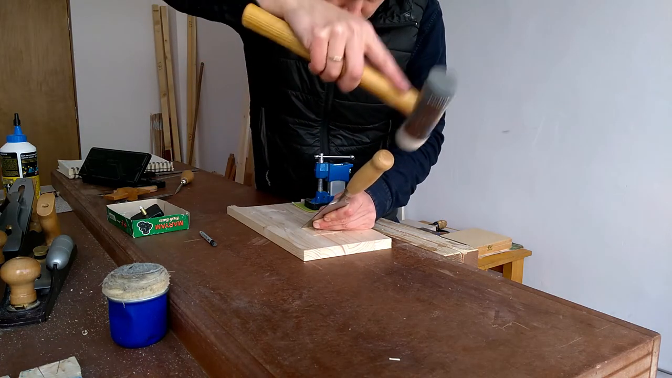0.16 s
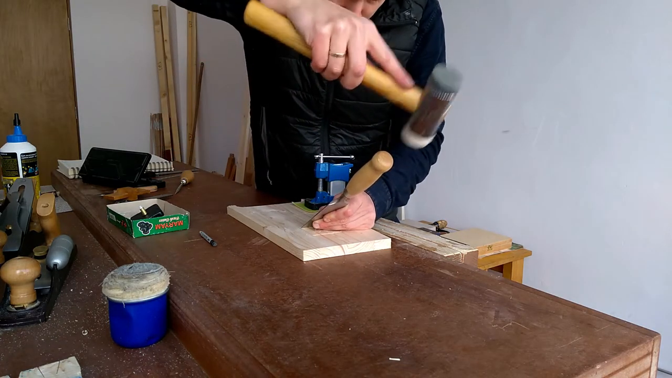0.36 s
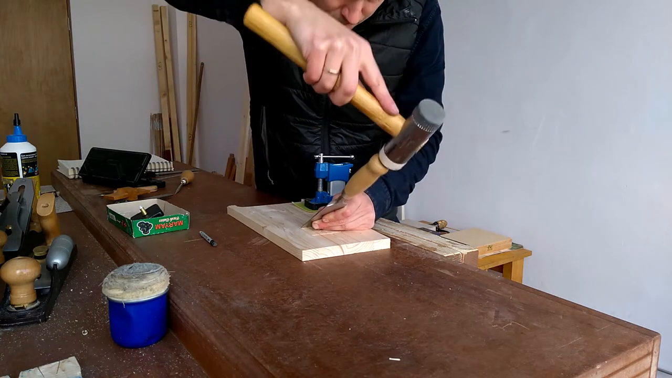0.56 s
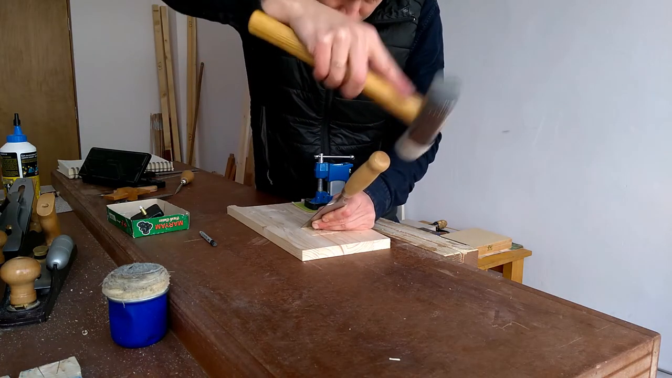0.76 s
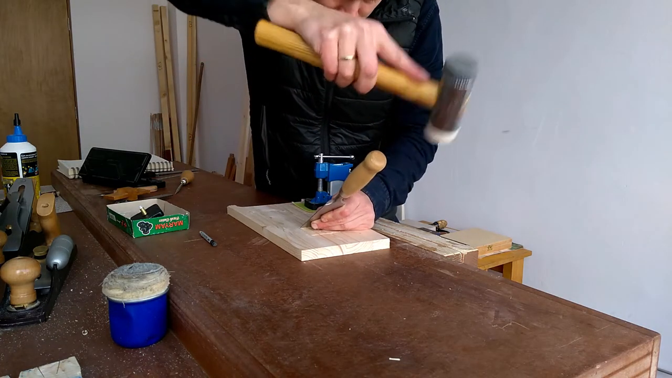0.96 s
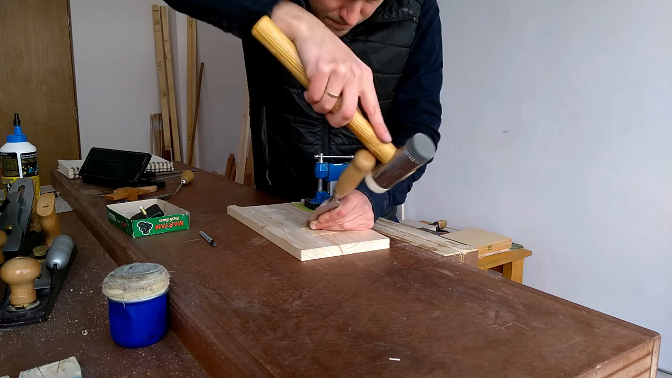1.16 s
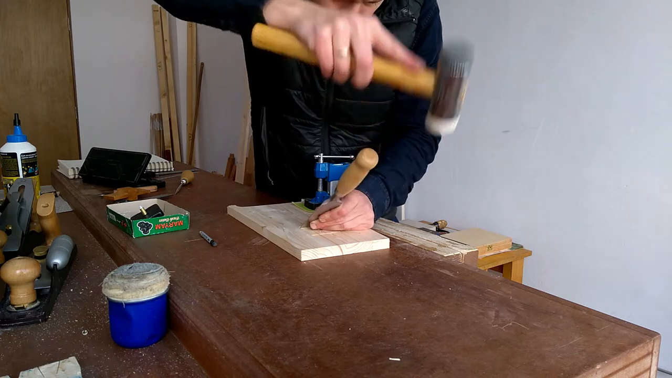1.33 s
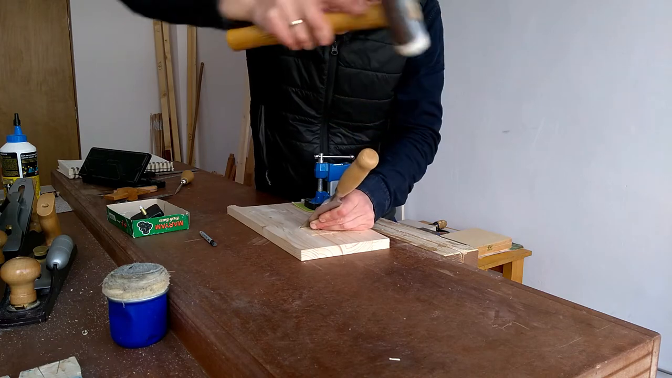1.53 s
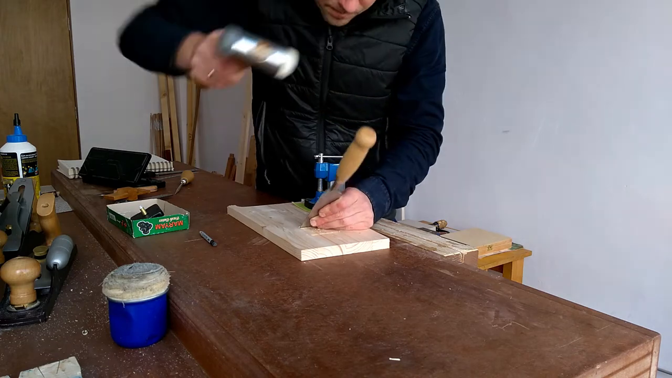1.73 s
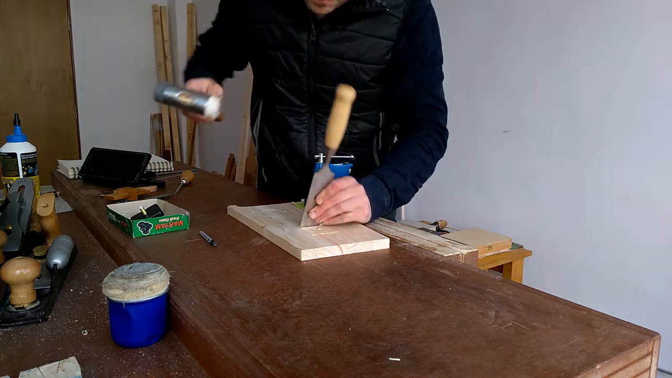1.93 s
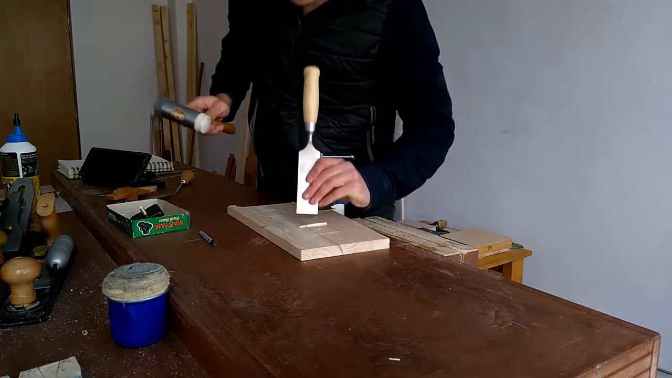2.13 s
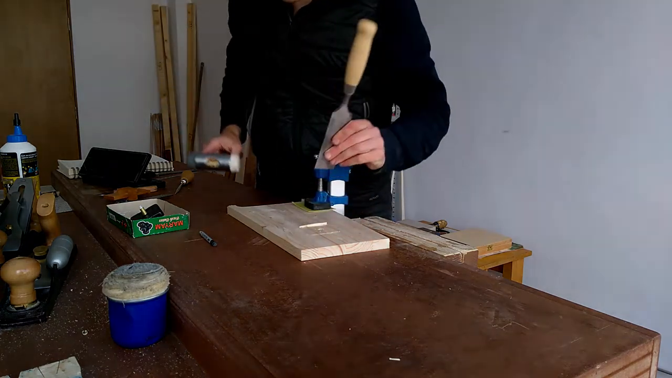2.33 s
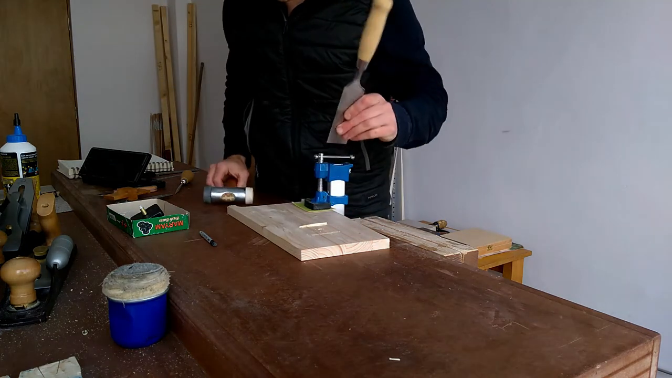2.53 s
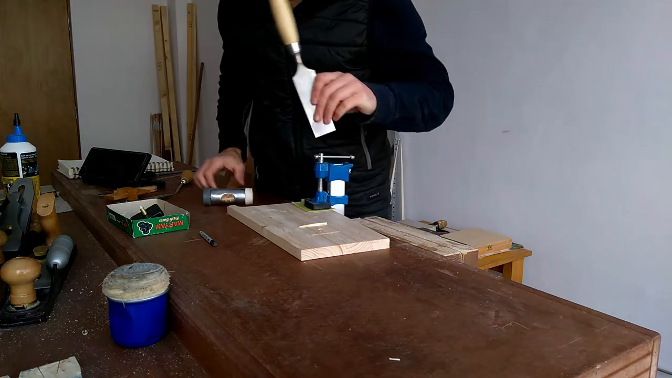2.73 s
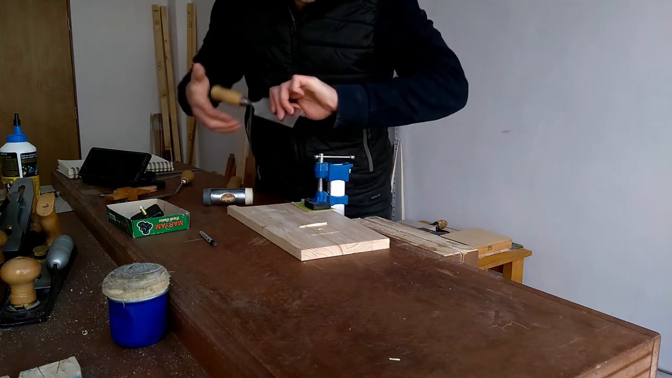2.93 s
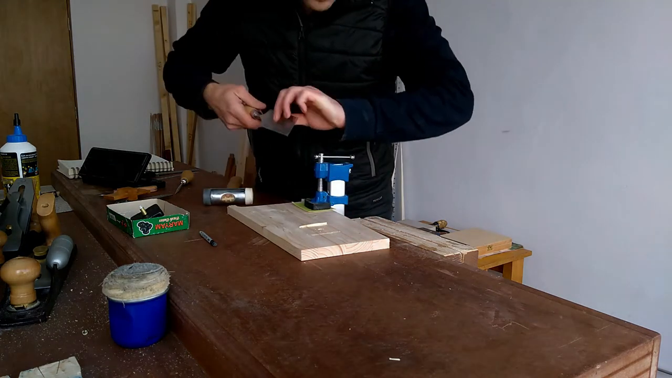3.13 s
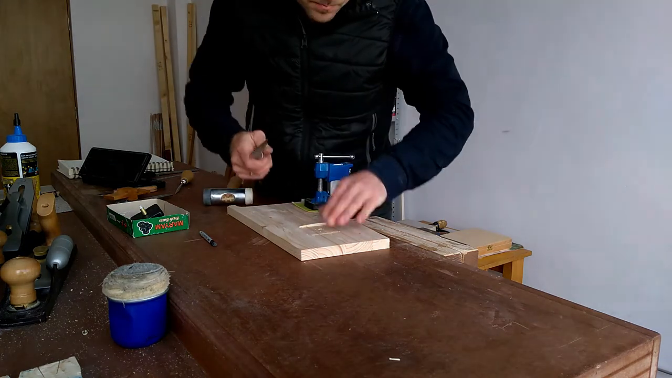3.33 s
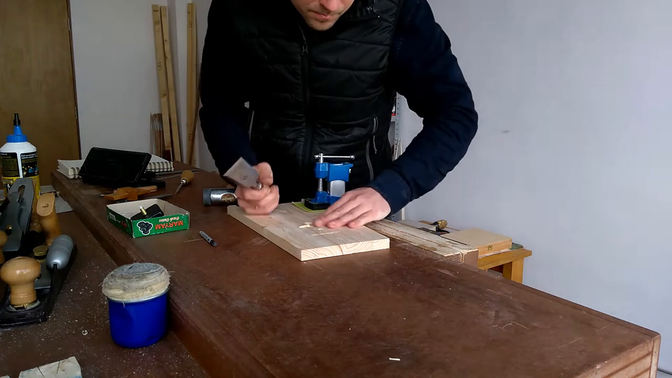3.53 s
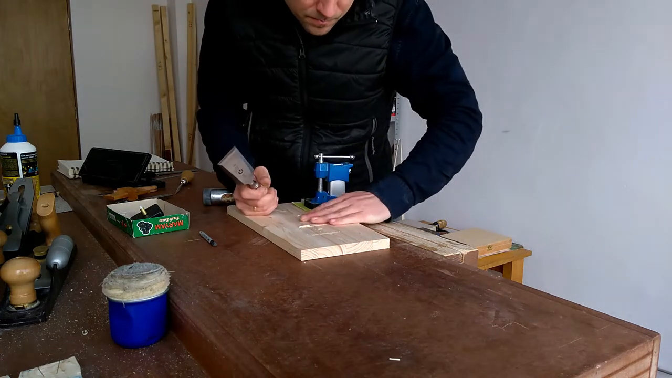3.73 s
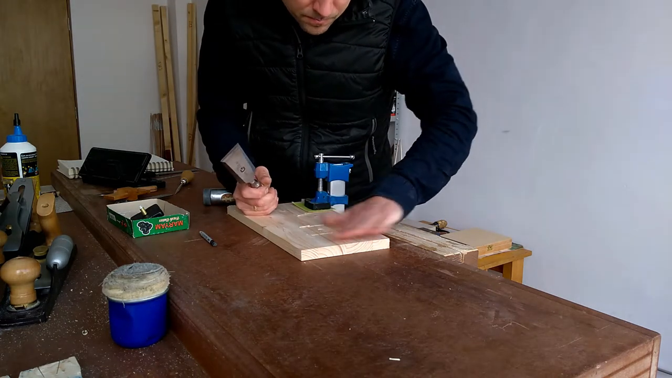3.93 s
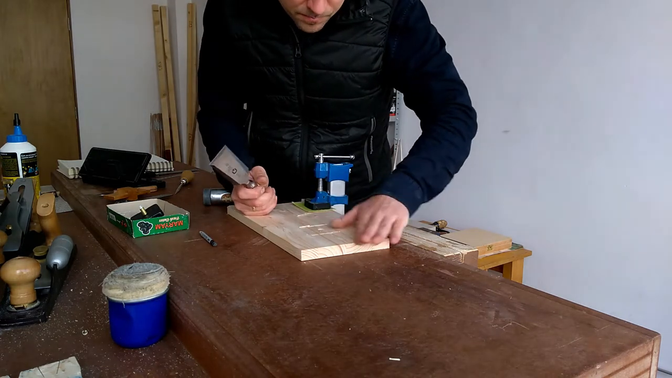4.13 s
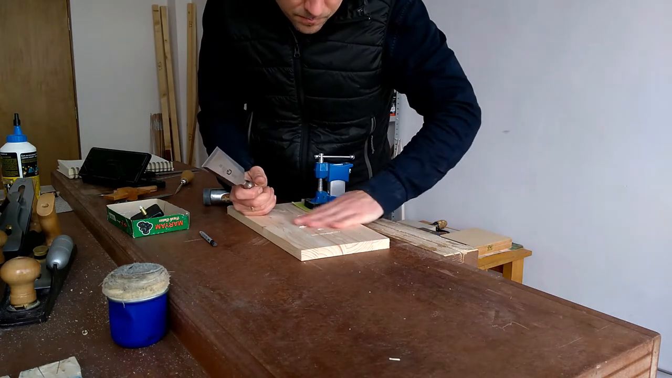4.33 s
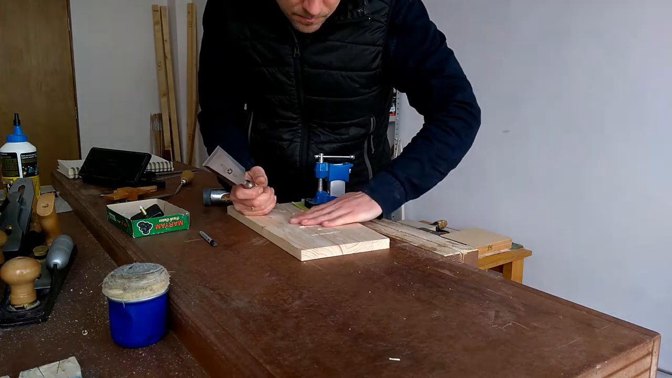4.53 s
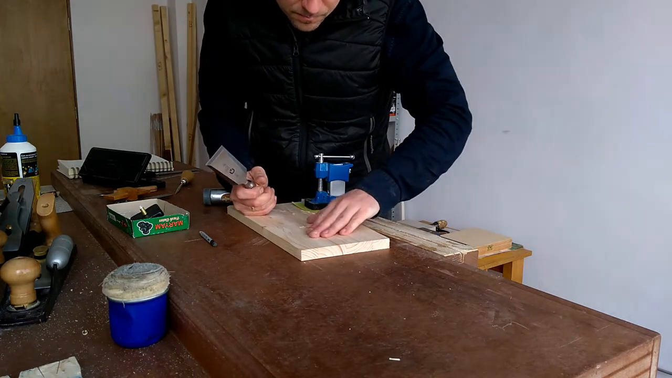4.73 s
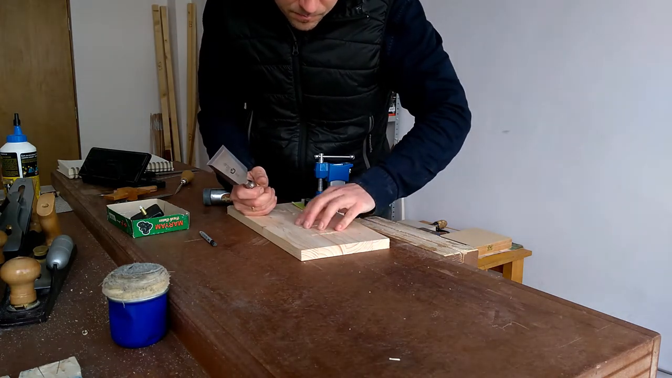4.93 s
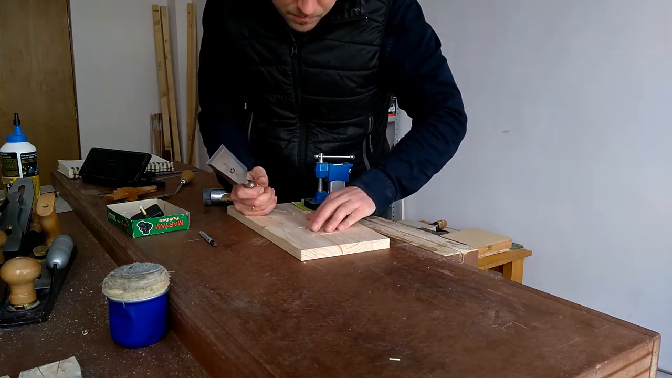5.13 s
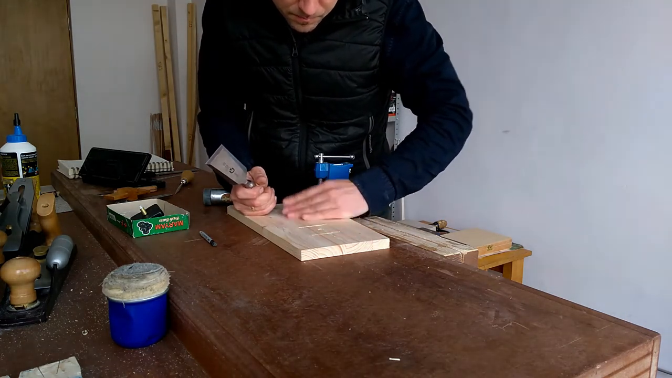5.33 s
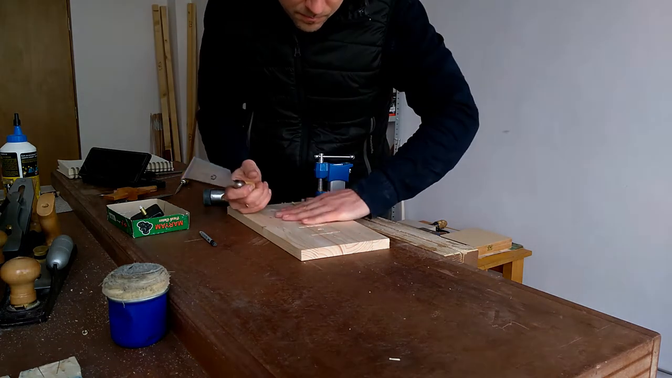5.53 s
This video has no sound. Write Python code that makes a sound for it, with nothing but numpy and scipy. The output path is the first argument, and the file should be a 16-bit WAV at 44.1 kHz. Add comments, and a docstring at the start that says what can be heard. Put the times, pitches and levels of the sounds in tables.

```python
"""A mallet drives a chisel into a clamped board in a bare, ringing workshop: five blows over faint
rumble and hiss. At 2.1 s the chisel is prised out and fibres snap. From 2.6 s the mallet is laid on the
bench: its soft face thuds, its steel head clinks. From 3.5 s a palm sweeps chips off the board in hissing
strokes, with clicks. A small camera with two unlike microphone ports listens from across the bench."""
import sys
import numpy as np
from scipy import signal
from scipy.fft import rfft, irfft, next_fast_len
from scipy.io import wavfile
from scipy.ndimage import uniform_filter1d

SR = 44100
rng = np.random.default_rng(int(sys.argv[2]) if len(sys.argv) > 2 else 0)


def generate_wav(sig):
    """Save sig (samples, or channels by samples) to the path in sys.argv[1] as 16-bit PCM at SR."""
    pcm = np.round(np.clip(np.atleast_2d(sig).T, -1, 1) * 32767).astype(np.int16)
    wavfile.write(sys.argv[1], SR, pcm)


N = 250752

# mallet blows: t/s, level/dB, boom/dB, board body/dB, handle ring/dB, blade ring/dB, crack/dB,
# then f/Hz, lift/dB of the favoured note of board, handle and blade
MALLET_BLOWS = [(-.03, -31.5, -10.5, 4, 4, 8, -15, 640, 4, 2280, 3, 5500, 0),
                (0.267, -25, -5.5, -3, 2, 6, 4.5, 484, 4, 2250, 3, 7300, 3),
                (.564, -21.5, -8, 0.5, 6, 5, 6, 900, 3, 1950, 3, 6250, 4),
                (.854, -23.5, -3.5, 1.5, 1.5, 6, 4.5, 800, 3, 1640, 4, 7000, 2),
                (1.155, -22.5, 1, -.5, 1, 3, 2, 646, 4.5, 1640, 4, 6800, 3)]
BLOW_SPECTRUM = [(24, -57.5), (40, -17.5), (112, -5), (155, -14), (249, -2.5), (372, -3.5), (733, -1.5),
                 (810, -2.5), (1090, -4), (2000, -7), (3470, -11.5), (4800, -18.5), (6300, -15.5),
                 (8770, -14), (14800, -32.5), (16000, -53)]  # f/Hz, density/dB
BOARD_MODES = [(256, 12, 0), (396, 20, 0.5), (485, 6.9, 10), (632, 21, 6.5), (796, 34, 6), (940, 15, 4.5)]  # f/Hz, width/Hz, lift/dB
HANDLE_MODES = [(1680, 410, 1), (1910, 240, 0.98), (2060, 190, 0.68)]  # wooden handle: f/Hz, width/Hz, share of ring
BLADE_MODES = [(2300, 120, 0.88), (3380, 280, 0.79), (5500, 200, 0.85), (6254, 220, 0.64), (7100, 250, .5),
               (8800, 180, 0.92), (15200, 1400, 1.1)]  # chisel steel: f/Hz, width/Hz, share of ring
SHOP_MODES = [(58.8, -40.5, 2.8), (110.5, -35, 2.3)]  # standing waves: f/Hz, level/dB, t60/s
SHOP_DECAY = [(50, 2.6), (130, 1.42), (350, 0.78), (920, 0.87), (2430, 0.72), (6400, 0.63), (14000, 0.31)]  # reverberation: f/Hz, t60/s
REFLECTIONS = [(.0035, -2, 1.5), (.0075, -7.5, -1.5), (.012, -0.5, -7), (.018, -12.5, -2.5), (.025, -12, 0)]  # first echoes: delay/s, level/dB, left over right/dB
AMBIENT_SPECTRUM = [(25, -22), (41, -24), (70, -7), (103, -1.5), (451, -23), (1280, -24.5), (4190, -31),
                    (5020, -33), (5620, -33), (6020, -33), (9490, -30.5), (10600, -35.5), (16000, -39)]  # background hiss: f/Hz, density/dB
AMBIENT_LEVELS = [(0, -64.5), (1.5, -60), (2.1, -60.5), (2.45, -68), (3.0, -61.5), (3.6, -65),
                  (4.85, -65.5), (5.1, -68), (5.69, -67)]  # background hiss: t/s, level/dB
# fibres and chips: t/s, click/dB, tilt/(dB/octave), ring f/Hz, ring lift/dB, echo/dB
WOOD_SNAPS = [(2.1281, -39, 3, 9400, 16, -62.5), (2.1299, -37.5, 5, 9480, 16, -60),
              (2.141, -21, 1, 2600, 4, -46), (2.145, -32.5, -4.5, 2620, 12, -57),
              (2.1497, -34.5, 4, 8040, 11, -52), (2.169, -36, 2, 9300, 12, -51),
              (3.5465, -50, 1, 9000, 7, -66), (3.571, -35, -3, 9040, 4, -60.5),
              (3.9258, -32, 1, 10930, 2, -53.5), (3.976, -37.5, 2.5, 9000, 7, -53.5),
              (4.3611, -33, 2.5, 9400, 4, -60), (4.3698, -27.5, 4, 6930, 8, -59.5),
              (4.3712, -31, 1.5, 7000, 12, -55), (4.3785, -32, 2, 6830, 11, -63),
              (4.9238, -33, 2.5, 10200, 6, -54), (4.9303, -40.5, 2.5, 9500, 5, -61.5),
              (4.9355, -37, -1, 2050, 14, -60), (5.3086, -37, 5, 9000, 3, -59.5)]
SNAP_SPECTRUM = [(290, -51), (500, -19.5), (1230, -11.5), (2730, -4), (3110, -9), (4600, -7.5),
                 (5020, -1.5), (5550, -7), (8330, -3.5), (15100, -10), (16000, -24)]  # f/Hz, density/dB
FACE_THUDS = [(2.613, -38.5, 2.5, 717), (2.652, -41, -5, 404), (2.7465, -31.5, 6, 710),
              (2.792, -41, -8, 666)]  # mallet on bench: t/s, level/dB, hardness/(dB/octave), favoured f/Hz
THUD_SPECTRUM = [(24, -46), (40, -42), (111, -14), (315, -5), (413, -3), (506, -14), (680, -2),
                 (933, -15.5), (2210, -30.5), (3720, -48), (9000, -60.5), (11700, -67), (19800, -120)]  # f/Hz, density/dB
BENCH_MODES = [(183.6, 45, 10), (344, 28, 0), (420, 90, 3.5), (643, 24, -0.5), (660, 69, 2.5)]  # f/Hz, width/Hz, lift/dB
HEAD_CLINKS = [(2.8115, -35), (2.8213, -37.5)]  # steel on steel: t/s, level/dB
CLINK_SPECTRUM = [(800, 4.5), (1500, 3), (2300, -2), (3500, 0), (5000, -20.5), (6800, -31.5),
                  (10000, -24.5), (16000, -53)]  # f/Hz, density/dB
STEEL_MODES = [(2276, 310, 8.5), (3467, 280, 16.5), (4080, 420, 10.5), (4860, 95, 13), (5820, 360, 33),
               (7300, 80, 20), (8280, 440, 23.5), (11200, 280, 16)]  # f/Hz, width/Hz, lift/dB
# palm strokes: full speed t/s, hiss/dB, rise/s, hold/s, fade/(dB/s), rub/dB, hiss centre f/Hz
PALM_STROKES = [(3.574, -57.5, 0.11, .1, 170, -63, 8540), (3.84, -69.5, .05, 0.066, 200, -89, 8350),
                (3.964, -47, 0.1, 0.0086, 170, -60.5, 8600), (4.239, -57, .11, .095, 200, -62, 8400),
                (4.378, -43, .02, .045, 135, -61.5, 7000), (4.65, -53.5, .13, .06, 165, -63, 8500),
                (4.886, -68, 0.11, 0.018, 160, -85, 8800), (4.928, -51, .015, 0.0089, 160, -58, 9000),
                (5.228, -59, .04, .02, 110, -69, 8840), (5.309, -56.5, .02, .06, 200, -63, 8400),
                (5.668, -52, 0.11, .03, 160, -61.5, 8250)]
RUB_SPECTRUM = [(400, -4), (700, -7.5), (900, -2.5), (1300, -3), (2000, -3), (2800, -3), (4000, -3),
                (7000, -19)]  # skin on wood: f/Hz, density/dB
PORT_COHERENCE = [(60, 0.98), (130, 0.92), (290, 0.89), (640, 0.39), (1410, -0.12), (3100, -0.1),
                  (6820, 0.46), (15000, 0.73)]  # f/Hz, left-right correlation
PORT_BALANCE = [(60, -1.5), (200, 0), (380, -0.5), (700, -0.5), (1290, -3.5), (2380, -5), (4400, 0),
                (6500, 1.5), (8800, 9), (11000, 7), (13000, -0.5), (16000, 6.5)]  # mallet sounds: f/Hz, left over right/dB
LIGHT_BALANCE = [(60, -5), (180, 1), (550, -1.5), (1650, -4), (2600, -3.5), (5000, 2), (6800, 3), (8800, 9),
                 (11500, 5), (15000, -2)]  # light sounds: f/Hz, left over right/dB


def amp(db):
    """dB to gain."""
    return 10 ** (np.asarray(db) / 20)


def unit(x):
    """Scale to rms 1."""
    return x / np.sqrt(np.mean(x ** 2) + 1e-20)


def along(points, hz):
    """Interpolate (f/Hz, value) points on a log axis."""
    f, v = np.transpose(points)
    return np.interp(np.log(hz + 1), np.log(f + 1), v)


def bump(hz, centre_hz, width_hz):
    """Resonance peak of height 1."""
    return 1 / (1 + (2 * (hz - centre_hz) / width_hz) ** 2)


def peaks_db(hz, modes, scale=1):
    """Summed lift of resonances."""
    return sum(scale * lift * bump(hz, centre_hz, width_hz) for centre_hz, width_hz, lift in modes)


def filtered(x, response):
    """Apply a frequency response."""
    size = next_fast_len(x.shape[-1] + 8192)
    return irfft(rfft(x, size) * response(np.fft.rfftfreq(size, 1 / SR)), size)[..., :x.shape[-1]]


def ports(pair, colour_db, balance):
    """Two independent noises, coloured, blended and panned as the ports hear them."""
    angle = lambda hz: np.arccos(np.clip(along(PORT_COHERENCE, hz), -1, 1)) / 2
    mid, side = filtered(pair, lambda hz: amp(colour_db(hz)) * [np.cos(angle(hz)), np.sin(angle(hz))])
    left_right = np.array([mid + side, mid - side])
    return filtered(left_right, lambda hz: amp(np.outer([.5, -.5], along(balance, hz))))


def stereo_noise(colour_db, balance=LIGHT_BALANCE, length=N):
    """Noise at the ports, rms 1."""
    return unit(ports(rng.standard_normal((2, length)), colour_db, balance))


def mono_noise(response):
    """Filtered noise, rms 1."""
    return unit(filtered(rng.standard_normal(N), response))


def grains(length, width_hz, centre_hz=8500, per_s=900, spread_db=1.5):
    """Sparse clicks of unequal size, louder on the left, rms 1."""
    sizes = amp(spread_db * rng.exponential(size=length)) * rng.standard_normal(length)
    impulses = sizes * (rng.uniform(size=length) < per_s / SR)
    clicks = filtered(impulses, lambda hz: bump(hz, centre_hz, width_hz))
    return unit(clicks * amp([[3], [-3]]))


def swell(at_s, db, rise_s, hold_s, fade_db_per_s):
    """Gain that climbs 30 dB per rise_s until at_s, holds, then fades."""
    t = np.arange(N) / SR - at_s
    return amp(db + 30 * np.minimum(t, 0) / rise_s - fade_db_per_s * np.maximum(t - hold_s, 0))


def add(track, at_s, sound):
    """Mix in a mono or stereo sound; at_s may be negative."""
    start = round(at_s * SR)
    part = np.atleast_2d(sound)[:, max(-start, 0):N - start]
    track[:, max(start, 0):][:, :part.shape[1]] += part


def knock(colour_db, balance, direct_db, direct_t60_s, build_s,
          dryness=1, edge_db=0, walls_db=-2, scatter_db=2):
    """Impact: direct burst, first reflections, then reverberation dying band by band."""
    t = np.arange(2 * SR) / SR
    band_hz, frame_s, bands = signal.stft(rng.standard_normal((2, len(t))), SR, nperseg=512)
    decay = amp(-60 * dryness * frame_s / along(SHOP_DECAY, band_hz)[:, None])
    tail = signal.istft(bands * decay, SR, nperseg=512)[1][:, :len(t)]
    ripple_db = scatter_db * rng.standard_normal(120)  # each hit stirs small resonances differently
    ripple_hz = np.linspace(0, SR / 2, len(ripple_db))
    tail = ports(tail, lambda hz: colour_db(hz) + np.interp(hz, ripple_hz, ripple_db), balance)
    out = tail / np.sqrt(np.mean(tail[:, :SR // 20] ** 2)) * (1 - np.exp(-t / build_s))
    burst_s = t[:1024]
    envelope = amp(direct_db - 60 * burst_s / direct_t60_s) * (1 - np.exp(-burst_s / .00051))
    bright_db = lambda hz: colour_db(hz) + edge_db * bump(hz, 8700, 1600)
    direct_path = (.00063, -walls_db, 8.7)
    for delay_s, db, pan_db in [direct_path] + REFLECTIONS:
        burst = envelope * stereo_noise(bright_db, balance, len(burst_s))
        add(out, delay_s, amp(walls_db + db) * amp([[pan_db / 2], [-pan_db / 2]]) * burst)
    return out


def boom(db):
    """The shop's lowest standing waves build slowly and ring long."""
    t = np.arange(3 * SR) / SR
    ring = sum(amp(db + mode_db - 60 * t / t60_s) * np.sin(2 * np.pi * hz * t + rng.uniform(0, 2 * np.pi))
               for hz, mode_db, t60_s in SHOP_MODES)
    return ring * (1 - np.exp(-t / .011))


def board_ring(db, favoured, t60_s=.4):
    """The struck board's hollow notes, heard direct."""
    t = np.arange(SR // 2) / SR
    ring = 0
    for hz, _, _ in BOARD_MODES:
        gain = amp(rng.normal(0, 3) + peaks_db(hz, favoured))
        port_phases = rng.uniform(0, 2 * np.pi) + rng.normal(0, hz / 1200, (2, 1))
        ring += gain * np.sin(2 * np.pi * hz * t + port_phases)
    return amp(db - 60 * t / t60_s) * (1 - np.exp(-t / .002)) * ring


def blade_rattle(db, t60_s=.2):
    """The blade chatters in its cut."""
    t = np.arange(SR // 2) / SR
    return amp(db - 60 * t / t60_s) * grains(len(t), width_hz=4000)


def mallet_blows():
    """Each blow rings board, handle and blade, each on a favoured note, and cracks in the treble."""
    out = np.zeros((2, N))
    relative_widths = (.14, .2, .14)  # board, handle, blade
    for at_s, db, boom_db, body_db, handle_db, blade_db, crack_db, *notes in MALLET_BLOWS:
        favoured = [(hz, width * hz, lift_db)
                    for hz, lift_db, width in zip(notes[::2], notes[1::2], relative_widths)]
        colour_db = lambda hz: (
            along(BLOW_SPECTRUM, hz) + crack_db * hz / (hz + 5000)
            + peaks_db(hz, BOARD_MODES) + body_db * bump(hz, 700, 540)
            + peaks_db(hz, HANDLE_MODES, handle_db) + peaks_db(hz, BLADE_MODES, blade_db)
            + peaks_db(hz, favoured))
        hit = knock(colour_db, PORT_BALANCE, direct_db=10, direct_t60_s=.012, build_s=.0018,
                    edge_db=11, scatter_db=1)
        add(out, at_s, amp(db) * hit)
        add(out, at_s, boom(boom_db))
        add(out, at_s, board_ring(db - 12, favoured))
        add(out, at_s, blade_rattle(db + crack_db - 16))
    return out


def ambience():
    """Far rumble caught in the lowest standing wave; faint hiss that sinks and swells."""
    rumble = mono_noise(lambda hz: bump(hz, 59, 26) ** 2)
    hiss = stereo_noise(lambda hz: along(AMBIENT_SPECTRUM, hz))
    hiss_db = np.interp(np.arange(N) / SR, *np.transpose(AMBIENT_LEVELS))
    return amp(-63.5) * rumble + amp(hiss_db) * hiss


def wood_snaps():
    """Breaking fibres and flicked chips click, with a short bright echo."""
    out = np.zeros((2, N))
    for at_s, db, tilt_db, ring_hz, ring_db, echo_db in WOOD_SNAPS:
        colour_db = lambda hz: (along(SNAP_SPECTRUM, hz) + tilt_db * np.log2(hz / 5000 + .1)
                                + ring_db * bump(hz, ring_hz, .36 * ring_hz))
        t60_s = .0025 + .0003 * abs(ring_db)  # a ringing chip lasts longer
        click = knock(colour_db, LIGHT_BALANCE, db - echo_db, t60_s,
                      build_s=.0013, dryness=1.29, walls_db=-11)
        add(out, at_s, amp(echo_db) * click)
    return out


def face_thuds(note_t60_s=.13):
    """The mallet's soft face lands and rocks, sounding the bench's note and the shop's boom."""
    out, t = np.zeros((2, N)), np.arange(SR // 4) / SR
    for at_s, db, hardness_db, note_hz in FACE_THUDS:
        colour_db = lambda hz: (along(THUD_SPECTRUM, hz) + hardness_db * np.log2(hz / 500 + 1)
                                + peaks_db(hz, BENCH_MODES) + 5.5 * bump(hz, note_hz, 160))
        thud = knock(colour_db, PORT_BALANCE, direct_db=2.5, direct_t60_s=.04, build_s=.004, dryness=1.11)
        bench_note = amp(db + 1.5 - 60 * t / note_t60_s) * np.sin(2 * np.pi * note_hz * t)
        add(out, at_s, amp(db) * thud)
        add(out, at_s, boom(db + 24))
        add(out, at_s, bench_note)
    return out


def head_clinks():
    """The steel head touches steel; the shop prolongs its short ring."""
    out = np.zeros((2, N))
    colour_db = lambda hz: along(CLINK_SPECTRUM, hz) + peaks_db(hz, STEEL_MODES)
    for at_s, db in HEAD_CLINKS:
        clink = knock(colour_db, PORT_BALANCE, direct_db=4, direct_t60_s=.01, build_s=.0015, dryness=.98)
        add(out, at_s, amp(db) * clink)
    return out


def dust_hiss(centre_hz, air_db_per_khz=2):
    """Dust dragged over the grain: rough hiss, more top octave as its centre rises, rms 1."""
    roughness = amp(1.2 * mono_noise(lambda hz: bump(hz, 0, 330)))
    pair = ports(rng.standard_normal((2, N)) * roughness, np.zeros_like, LIGHT_BALANCE)
    hz, frame_s, bands = signal.stft(pair, SR, nperseg=256)
    centre_hz = np.interp(frame_s, np.arange(N) / SR, centre_hz)
    air = amp(-3.5 + air_db_per_khz * (centre_hz - centre_hz.max()) / 1000)
    shape = bump(hz[:, None], centre_hz, 4500) ** 2 + air * bump(hz[:, None], 16000, 9000)
    # contact shifts between fingers: patches of hiss swell and sink
    patches = uniform_filter1d(rng.standard_normal(bands.shape[1:]), size=3, axis=0)
    patches = uniform_filter1d(patches, size=14, axis=1)
    shape *= amp(2.5 * unit(patches))
    return unit(signal.istft(bands * shape, SR, nperseg=256)[1][:, :N])


def palm_sweeps(rub_fade_ratio=.7):
    """Hiss and rolling grit follow the palm's speed; skin rub and bench rumble follow its pressure."""
    speeds, pressure = [], 0
    for at_s, hiss_db, rise_s, hold_s, fade_db_per_s, rub_db, _ in PALM_STROKES:
        speeds.append(swell(at_s, hiss_db, rise_s, hold_s, fade_db_per_s))
        pressure += swell(at_s, rub_db, rise_s, hold_s, rub_fade_ratio * fade_db_per_s)
    loudest = np.argmax(speeds, axis=0)
    hiss = dust_hiss(centre_hz=np.array(PALM_STROKES)[loudest, -1])
    grit = amp(-13) * grains(N, width_hz=4500)
    rub = stereo_noise(lambda hz: along(RUB_SPECTRUM, hz))
    rumble = amp(-10) * mono_noise(lambda hz: bump(hz, 70, 60) + .6 * bump(hz, 180, 90))
    return sum(speeds) * (hiss + grit) + pressure * (rub + rumble)


def palm_catch():
    """The palm catches once and drones."""
    drone = stereo_noise(lambda hz: 20 * np.log10(bump(hz, 880, 190)))
    return swell(at_s=4.22, db=-65.5, rise_s=.17, hold_s=0, fade_db_per_s=150) * drone


def scene():
    """All sources, stereo."""
    return (mallet_blows() + ambience() + wood_snaps() + face_thuds() + head_clinks()
            + palm_sweeps() + palm_catch())


def record(dry):
    """Microphone bass roll-off and camera band limit."""
    bass_hz, top_hz = 32, 16000
    return filtered(dry, lambda hz: (hz < top_hz) * (1j * hz / (bass_hz + 1j * hz)) ** 2)


dry = scene()
out = record(dry)
generate_wav(out)
```